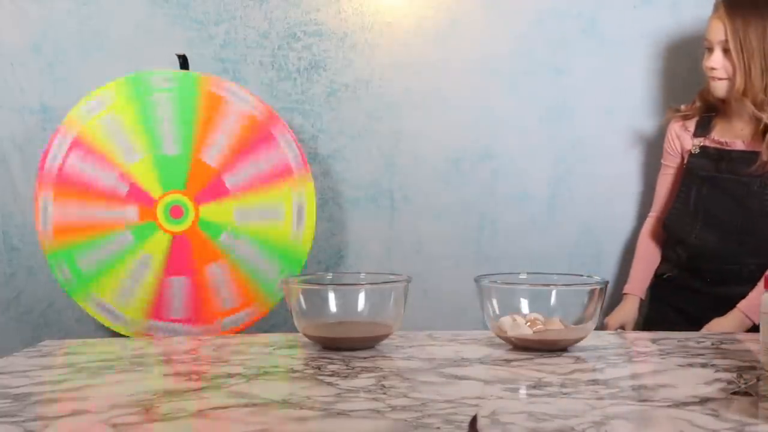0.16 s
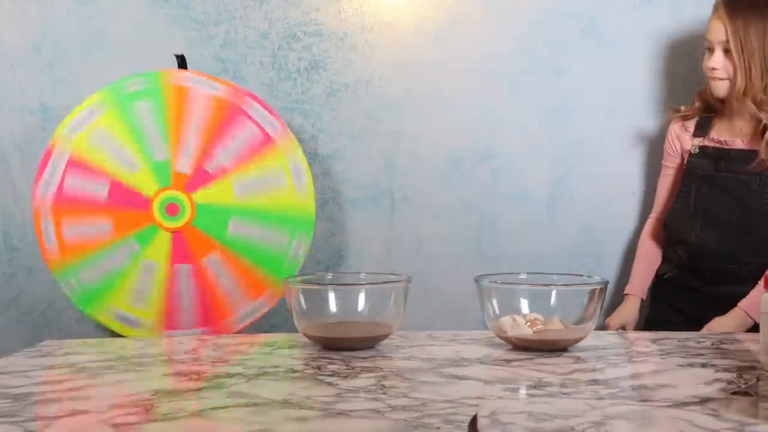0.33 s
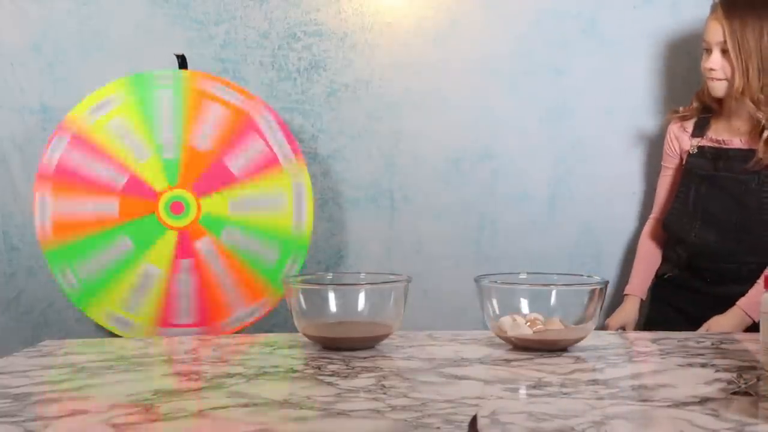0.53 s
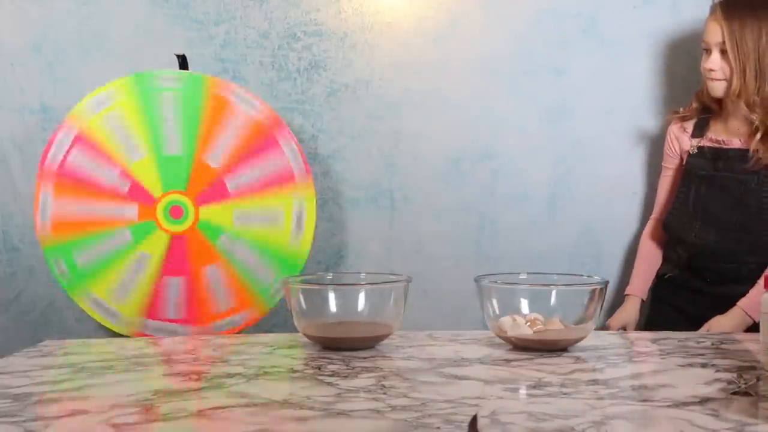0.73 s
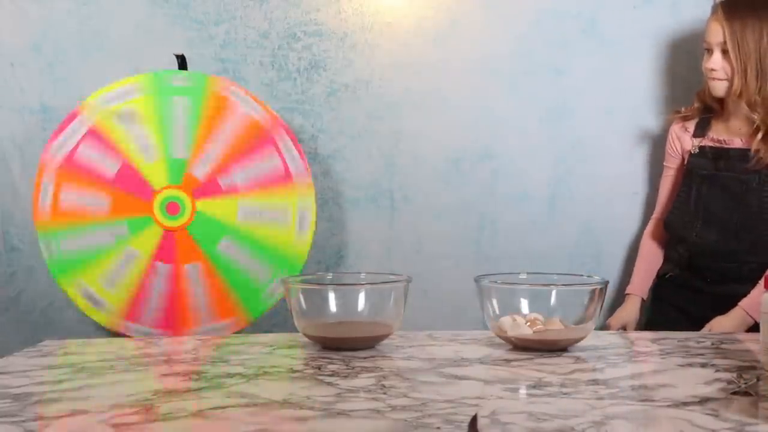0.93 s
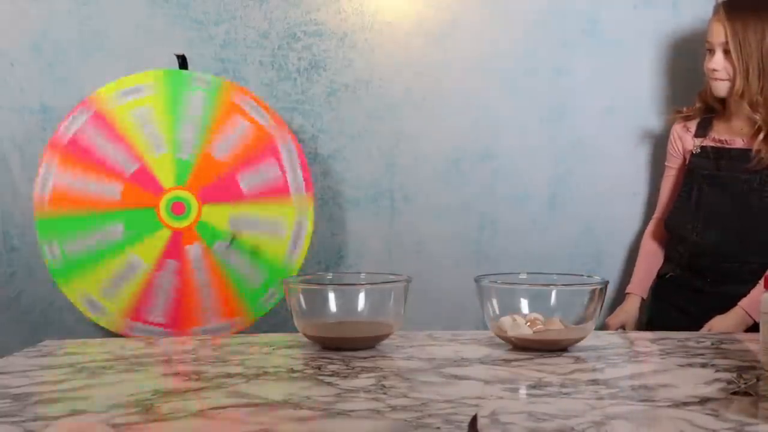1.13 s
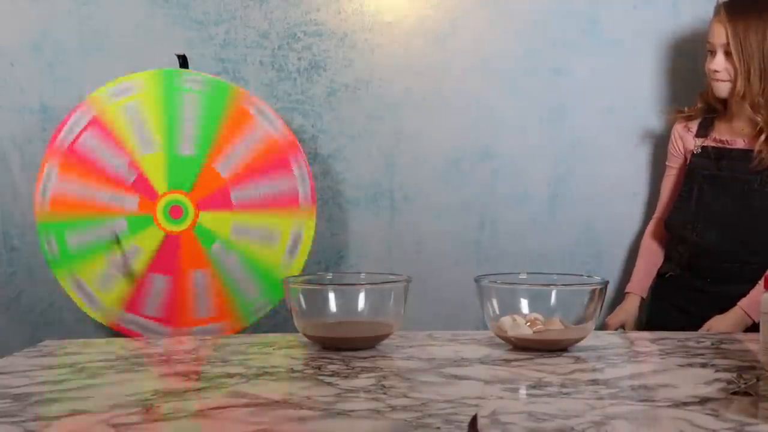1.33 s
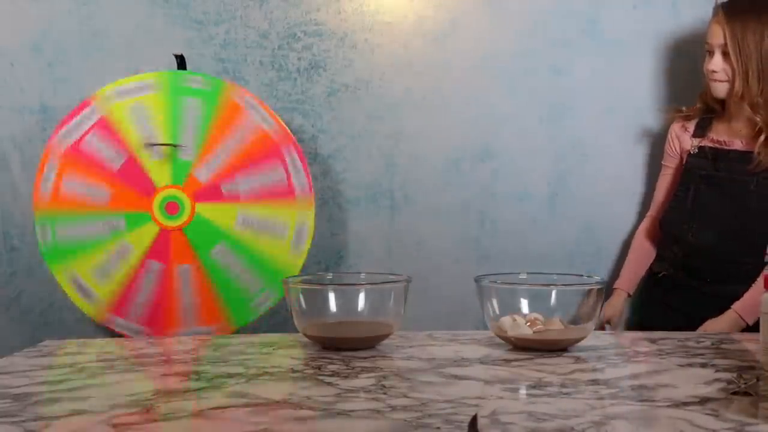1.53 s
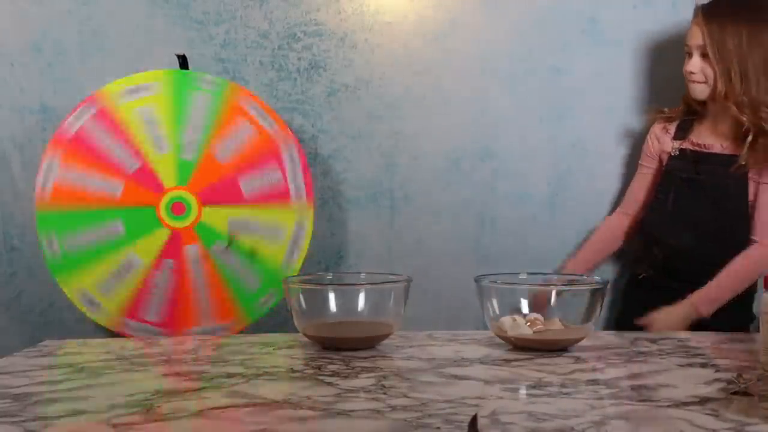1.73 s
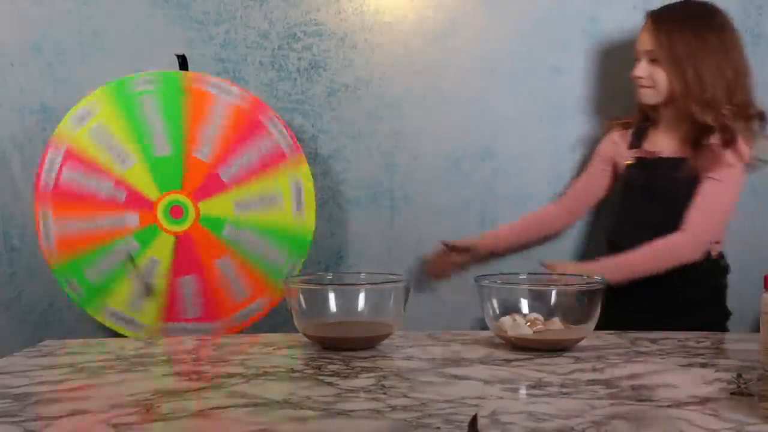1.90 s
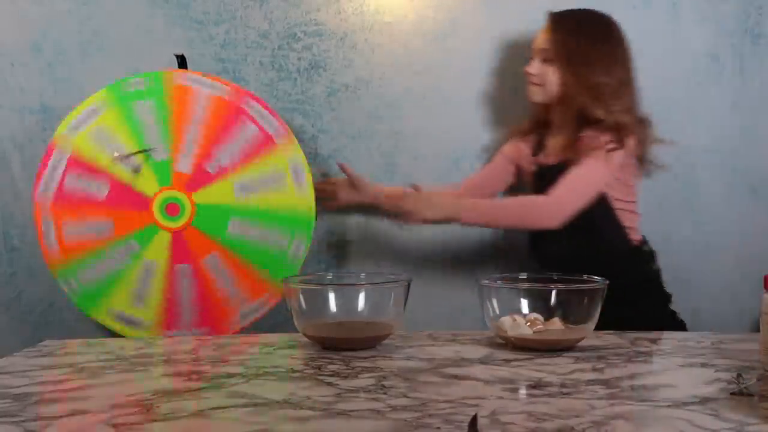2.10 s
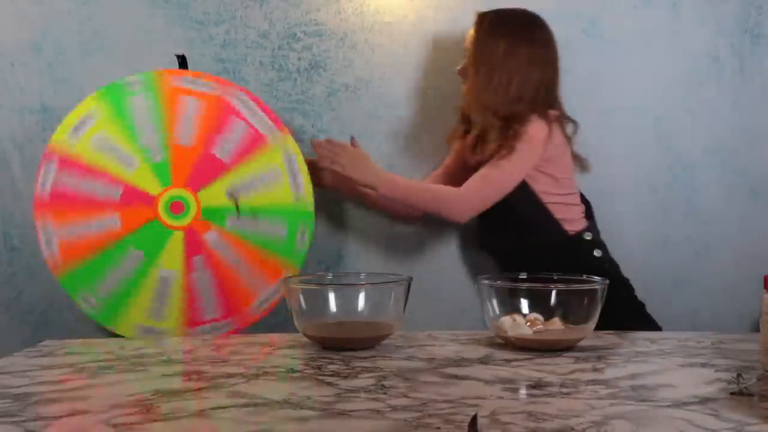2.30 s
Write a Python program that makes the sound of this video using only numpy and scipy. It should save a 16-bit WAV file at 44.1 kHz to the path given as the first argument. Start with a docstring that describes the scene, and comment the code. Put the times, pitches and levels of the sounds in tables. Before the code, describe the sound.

Loud uneven wooden knocks from a spinning wheel, with one overloaded sharp dart smack into its board

```python
"""Small room: a homemade prize wheel spins on a table, knocking unevenly against its mount.
Knocks and the dart's smack into the board are impulses or noise bursts, decaying modes and room reflections.
Rub, rumble, rustle and noise floor are coloured noise on level curves; bumps and chafes are banded bursts.
Someone steps over: clothes rustle above one deep footfall. The dart overloads the microphone."""
import sys
import numpy as np
from scipy import signal
from scipy.fft import rfft, irfft
from scipy.io import wavfile

SR = 44100
rng = np.random.default_rng(int(sys.argv[2]) if len(sys.argv) > 2 else 0)


def master(y):
    """Save y as 16-bit WAV."""
    cut = np.clip(np.atleast_2d(y).T, -1, 1)
    pcm = np.round(cut * 32767)  # scale
    wavfile.write(sys.argv[1], SR, pcm.astype(np.int16))


N = 108177

# All *_COLOUR tables: relative spectrum, later scaled to unit power: f/Hz, level/dB

# Noise floor
FLOOR_COLOUR = [(15, -32.5), (25, -13.5), (53, -5.5), (133, -27), (411, -8), (563, -23.5), (3510, -35),
                (3800, -31.5), (13000, -47.5)]
FLOOR_DB = -63.5

# Stereo width: f/Hz, side minus mid/dB
SIDE_DB = [(40, -30.5), (110, -22), (200, -12), (380, -11), (700, -11.5), (1300, -11.5), (2400, -9.5),
           (4400, 0), (8100, 1.5), (13000, 6.5)]
# Room decay per band: f/Hz, t60/s
ROOM_T60 = [(80, .4), (300, 0.41), (1000, 0.31), (2500, 0.29), (6000, 0.32), (12000, 0.31)]
# First reflections off the near walls: t/s, level/dB
ECHOES = [(0.008, -15.5), (0.027, -20.5)]
ROOM_GAP_S, ROOM_BUILD_S = 0.003, 0.001

# Clothes' rustle, before its random catches: t/s, level/dB
RUSTLE_LEVEL = [(1.98, -55), (2.05, -46), (2.1, -53), (2.17, -50), (2.21, -41), (2.262, -41.5),
                (2.31, -51.5), (2.39, -52)]
RUSTLE_COLOUR = [(130, -8), (260, 3.5), (850, -6.5), (1400, -12), (2100, -10.5), (3600, -19), (6800, -26),
                 (9500, -40.5), (12000, -50.5)]
RUSTLE_GRAIN_DB, RUSTLE_GRAIN_S = 2, 0.008
STEP_S, STEP_HZ, STEP_DB, STEP_T60_S = 2.186, 21, -31, 0.25

# Wheel's rubbing: t/s, level/dB
RUB_LEVEL = [(0, -49), (.2, -53.5), (.28, -51), (.42, -49), (.53, -50.5), (.62, -51), (.84, -51),
             (.94, -49.5), (1.0, -50.5), (1.08, -50), (1.3, -54), (1.449, -61), (1.56, -56), (1.63, -54.5),
             (1.71, -56.5), (1.8, -54), (2.0, -50), (2.45, -51)]
RUB_COLOUR = [(110, 2.5), (350, -2), (660, -6.5), (1000, -7.5), (1700, -11.5), (2400, -15), (3600, -19),
              (7000, -29), (12000, -37)]
# Wheel's low rumble: t/s, level/dB
RUMBLE_LEVEL = [(0, -39.5), (.06, -50), (.1, -34), (.27, -56.5), (.35, -38.5), (.42, -50), (.47, -43.5),
                (.6, -55), (.69, -38.5), (.8, -54), (.95, -47.5), (1.08, -55), (1.35, -58.5), (1.78, -58),
                (1.85, -44.5), (1.97, -52.5), (2.08, -46), (2.45, -42.5)]
RUMBLE_COLOUR = [(15, -7), (30, -3.5), (48, 1), (75, -3), (97, 3), (130, -12.5), (220, -15.5), (500, -60.5)]

# Soft bumps of the turning wheel: t/s, level/dB, f/Hz
TAPS = [(0.027, -45, 380), (0.371, -60, 474), (1.484, -58, 305), (1.624, -45, 143)]
TAP_T60_S, TAP_SHARPNESS = 0.16, 1.05
# Brief chafes of the wheel's rim: t/s, length/s, level/dB, f/Hz, sharpness/1
CHAFES = [(0.862, 0.04, -53, 1690, 3), (0.929, .035, -52, 1590, 0.77), (1.58, 0.068, -61, 1440, 2),
          (2.412, 0.012, -38.5, 1050, 0.72)]
CHAFE_RELEASE_S = 0.018  # time constant

# Modes struck by the dart: f/Hz, level/dB, t60/s (capped in ring)
DART_MODES = [(1104.5, 6.5, 0.029), (274, -26, 0.17), (304, -25.5, 0.4), (903, -27.5, 0.23),
              (988, -23.5, 0.31), (1051, -13, .19), (1228, -24, .18), (1520, -14.5, 0.11),
              (1634, -21.5, 0.15), (1738, -25.5, .24), (1998, -21.5, .24), (2283, -17, .17),
              (2318, -31, .22), (2550, -28.5, .19), (2654, -20, .2), (2990, -27, .2)]
CRACK_COLOUR = [(60, -21), (300, -14), (700, -3), (1100, 13.5), (2600, -3), (3400, -4.5), (5500, -17.5),
                (8500, -23.5), (14000, -40)]
DART_ROOM_COLOUR = [(60, -26.5), (170, -20), (300, -1), (480, -18.5), (780, -10), (1050, 0.5), (1400, 0),
                    (2200, 0.5), (2900, -8), (3500, -23), (4600, -26), (6600, -24.5), (8200, -38),
                    (10000, -42.5)]
DART_S, DART_CRACK_DB, CRACK_T60_S, CRACK_SIDE_DB = 1.1098, 24, 0.018, -10
DART_ROOM_DB, DART_ROOM_DELAY_S = 21.5, 0.002

# Wheel knocks: t/s, level/dB, contact cut-off f/Hz, bass/dB, scrape/dB, clack f/Hz, clack/dB
KNOCKS = [(0.0749, -0.5, 2860, 2, -46.5, 1796, -36.5), (0.3138, -6, 3230, -2, -76, 1224, -29),
          (0.4516, -13, 2180, 12, -51, 353, -28), (0.6608, 1, 2000, 5, -43.5, 1068, -29),
          (1.8204, -5, 2200, 8, -52.5, 917, -47), (2.4312, 1.5, 2340, 4, -48, 864, -25.5)]
# Board modes, before detuning: f/Hz, level/dB, t60/s (capped in ring)
BOARD_MODES = [(246.3, -36, 0.32), (336.8, -52.5, 0.26), (354, -31.5, 0.067), (404, -29.5, 0.15),
               (583, -33.5, 0.21), (766, -30, 0.09), (895, -37.5, 0.32), (1068, -25.5, 0.043),
               (1136, -40, 0.45), (1822, -36, 0.073)]
KNOCK_COLOUR = [(40, -17), (90, -6.5), (160, -4.5), (280, 6), (600, 2), (1050, 4.5), (1450, 0.5),
                (1950, 0.5), (3300, -8), (4200, -16), (6000, -20.5), (12000, -25)]
PUSH_DB, KNOCK_ROOM_DB, RATTLE_DB, RATTLE_T60_S = -13, 7.5, -2.5, 0.017
BASS_HZ, CLACK_T60_S, LONGEST_RING_S = 427, 0.16, 0.3
SCRAPE_COLOUR = [(1500, -10), (4000, 6), (7000, 6.5), (10000, 2.5), (14000, -33)]
SCRAPE_DELAY_S, SCRAPE_RISE_S, SCRAPE_T60_S = 0.002, 0.01, 0.24

CLIP_KNEE, TOP_HZ = 8, 15800


def undb(db):
    """Amplitude of a level in dB."""
    return 10 ** (np.asarray(db) / 20)


def clock():
    """Sample times in s."""
    return np.arange(N) / SR


def freqs():
    """Bin frequencies in Hz, at least 1."""
    return np.maximum(np.fft.rfftfreq(N, 1 / SR), 1)


def over_hz(points):
    """Joins (Hz, value) points on a log-frequency axis."""
    hz, value = np.array(points, float).T
    return np.interp(np.log(freqs()), np.log(hz), value)


def unit_power(gain):
    """Scales a gain to unit mean square over frequency."""
    return gain / np.sqrt(np.mean(gain ** 2))


def colour(points):
    """Unit-power gain of a spectrum, falling away beyond its ends."""
    f = freqs()
    low_cut = np.hypot(1, (points[0][0] / f) ** 2)
    high_cut = np.hypot(1, (f / points[-1][0]) ** 4)
    return unit_power(undb(over_hz(points)) / low_cut / high_cut)


def band(hz, sharpness):
    """Unit-power gain of one resonance."""
    f = freqs()
    return unit_power(1 / (1 + (sharpness * (f / hz - hz / f)) ** 2))


def shape(x, gain):
    """Causal minimum-phase filter with the given gain per frequency, via the folded cepstrum."""
    size = 16384
    log_gain = np.interp(np.fft.rfftfreq(size, 1 / SR), freqs(), np.log(gain + 1e-6))
    cepstrum = irfft(log_gain)
    cepstrum[1:size // 2] *= 2
    cepstrum[size // 2:] = 0
    impulse = irfft(np.exp(rfft(cepstrum)))[None, :size // 2]
    return signal.fftconvolve(np.atleast_2d(x), impulse, axes=1)[:, :N]


def fade(t60_s):
    """Exponential decay, 60 dB in t60_s."""
    return np.exp(-np.log(1000) * clock() / t60_s)


def unit_energy(x):
    """Scales to unit energy, averaged over channels."""
    return x / np.sqrt(np.mean(np.sum(x ** 2, axis=-1)))


def at(x, start_s):
    """Delays a sound to start at start_s."""
    delay = max(int(start_s * SR), 0)
    return np.pad(np.atleast_2d(x), ((0, 0), (delay, 0)))[:, :N]


def diffuse(envelope=0.96, side_db=0.):
    """Enveloped noise from all around: alike in both channels in the bass, wide in the treble."""
    mid, side = rng.standard_normal((2, N)) * envelope
    side = shape(side, undb(over_hz(SIDE_DB) + side_db))[0]
    return np.array([mid + side, mid - side])


def wash(points, level_curve):
    """Coloured noise on a level curve."""
    coloured = irfft(rfft(diffuse()) * colour(points), N)
    times_s, levels_db = np.array(level_curve).T
    return coloured * undb(np.interp(clock(), times_s, levels_db))


def ring(modes, detune=0.):
    """Decaying sine modes of alternating sign; detune is the random relative pitch spread."""
    t, out = clock(), 0
    for k, (hz, db, t60_s) in enumerate(modes):
        mode_hz = hz * (1 + detune * rng.standard_normal())
        decay = fade(min(t60_s, LONGEST_RING_S))
        out = out + (-1) ** k * undb(db) * decay * np.sin(2 * np.pi * mode_hz * t)
    return out


def room():
    """Room response: two wall echoes plus dense reflections with a decay time per band."""
    t, tail = clock(), 0
    spectrum = rfft(diffuse())
    for hz, t60_s in ROOM_T60:
        band_weight = over_hz([(f, f == hz) for f, _ in ROOM_T60])
        tail = tail + irfft(spectrum * band_weight, N) * fade(t60_s)
    build = 1 - np.exp(-t / ROOM_BUILD_S)
    tail = unit_energy(at(tail * build, ROOM_GAP_S))
    return tail + sum(at(undb(db) * (t == 0), s) for s, db in ECHOES)


def noise_floor():
    """Steady coloured noise."""
    return wash(FLOOR_COLOUR, [(0, FLOOR_DB)])


def person():
    """Clothes rustle in small uneven catches over one deep footfall, a decaying sine."""
    catches = np.interp(clock() / RUSTLE_GRAIN_S, np.arange(N), rng.standard_normal(N))
    lead_in = [(RUSTLE_LEVEL[0][0] - 0.1, -100)]
    cloth = wash(RUSTLE_COLOUR, lead_in + RUSTLE_LEVEL) * undb(RUSTLE_GRAIN_DB * catches)
    return cloth + at(ring([(STEP_HZ, STEP_DB, STEP_T60_S)]), STEP_S)


def wheel_turning():
    """Friction rub and low rumble of the wheel: two noise washes."""
    return wash(RUB_COLOUR, RUB_LEVEL) + wash(RUMBLE_COLOUR, RUMBLE_LEVEL)


def wheel_taps():
    """Soft bumps: decaying noise through one resonance each."""
    out = np.zeros((2, N))
    for s, db, hz in TAPS:
        bump = shape(diffuse(fade(TAP_T60_S)), band(hz, TAP_SHARPNESS))
        out += undb(db) * at(bump, s)
    return out


def wheel_chafes():
    """Rim chafes: noise held, then released, through one resonance each."""
    out = np.zeros((2, N))
    for s, length_s, db, hz, sharpness in CHAFES:
        held = np.exp(-np.maximum(clock() - length_s, 0) / CHAFE_RELEASE_S)
        out += undb(db) * at(shape(diffuse(held), band(hz, sharpness)), s)
    return out


def dart():
    """The point cracks into the board, which rings and sets off the room."""
    burst = unit_energy(diffuse(fade(CRACK_T60_S), CRACK_SIDE_DB))
    crack = undb(DART_CRACK_DB) * shape(burst, colour(CRACK_COLOUR))
    reflections = at(shape(room(), colour(DART_ROOM_COLOUR)), DART_ROOM_DELAY_S)
    return at(ring(DART_MODES) + crack + undb(DART_ROOM_DB) * reflections, DART_S)


def scrape_burst():
    """Light scrape: coloured noise with a soft rise and a decay."""
    rise = 1 - np.exp(-clock() / SCRAPE_RISE_S)
    return shape(diffuse(), colour(SCRAPE_COLOUR)) * fade(SCRAPE_T60_S) * rise


def wheel_knocks():
    """Push, short rattle, room and board ring through a contact filter; clack pitch follows the spot struck."""
    out, f, t = np.zeros((2, N)), freqs(), clock()
    for s, db, contact_hz, bass_db, scrape_db, clack_hz, clack_db in KNOCKS:
        push = undb(PUSH_DB) * (t == 0)
        rattle = undb(RATTLE_DB) * unit_energy(rng.standard_normal(N) * fade(RATTLE_T60_S))
        struck = undb(KNOCK_ROOM_DB) * room() - (push + rattle)
        body = shape(struck, colour(KNOCK_COLOUR)) + ring(BOARD_MODES, detune=0.0049)
        bass_gain = undb(bass_db / (1 + (f / BASS_HZ) ** 2))
        contact = bass_gain / np.hypot(1, (f / contact_hz) ** 2)
        clack = ring([(clack_hz, clack_db, CLACK_T60_S)])
        knock = shape(body, contact) - clack
        out += at(undb(db) * knock, s)
        out += at(undb(scrape_db) * scrape_burst(), s + SCRAPE_DELAY_S)
    return out


def scene():
    """Sums all layers, background first."""
    background = noise_floor() + person()
    wheel_motion = wheel_turning() + wheel_taps() + wheel_chafes()
    return background + wheel_motion + dart() + wheel_knocks()


def record(dry):
    """The microphone overloads towards full scale and the top is cut."""
    clipped = dry / (1 + np.abs(dry) ** CLIP_KNEE) ** (1 / CLIP_KNEE)
    top_cut = signal.ellip(8, 0.1, 50, TOP_HZ, fs=SR, output="sos")
    return signal.sosfiltfilt(top_cut, clipped)


dry = scene()
out = record(dry)
master(out)
```